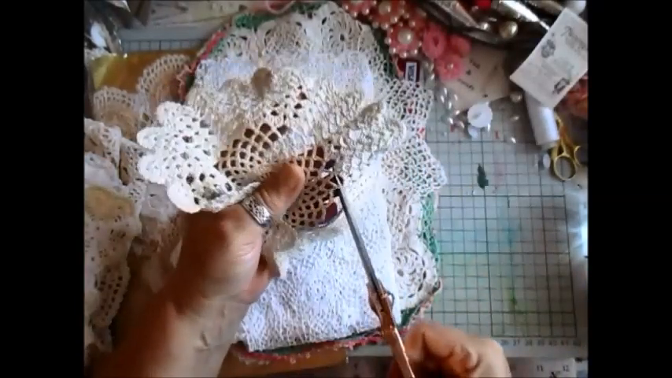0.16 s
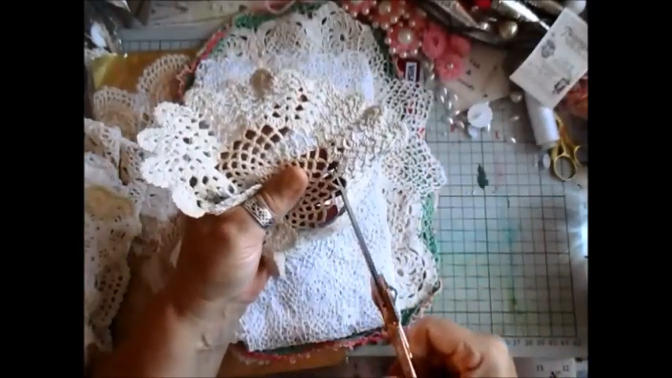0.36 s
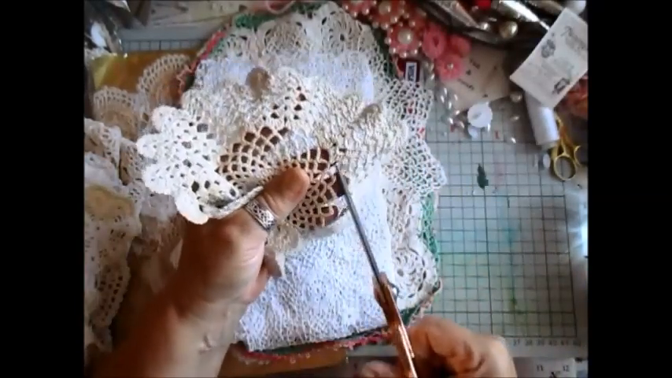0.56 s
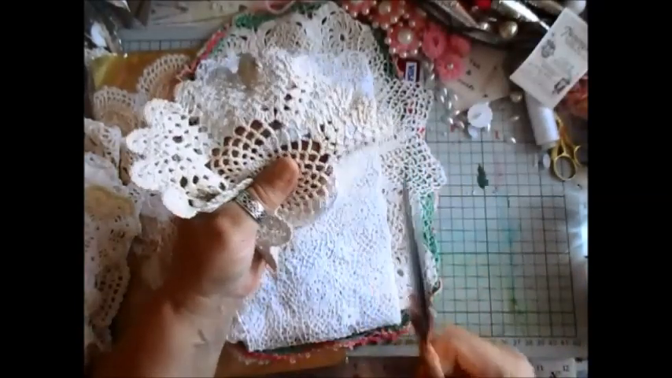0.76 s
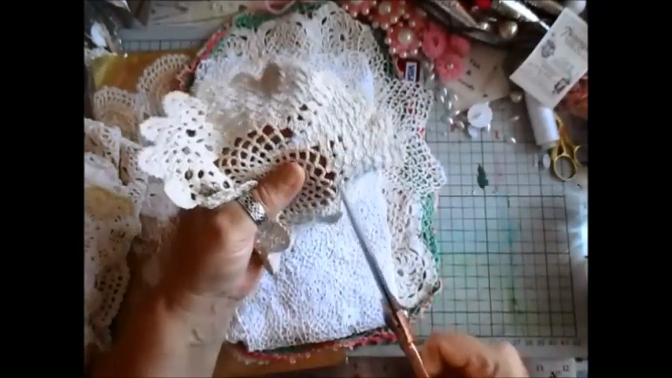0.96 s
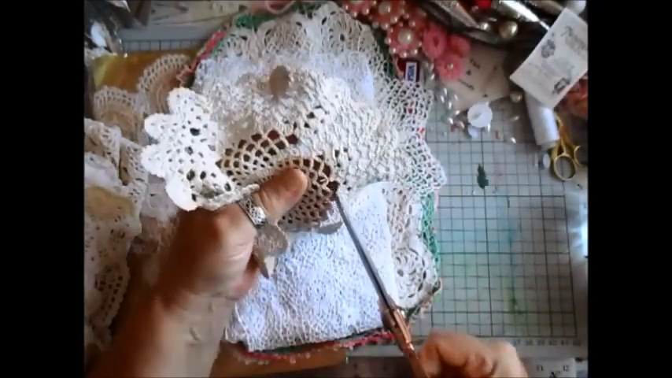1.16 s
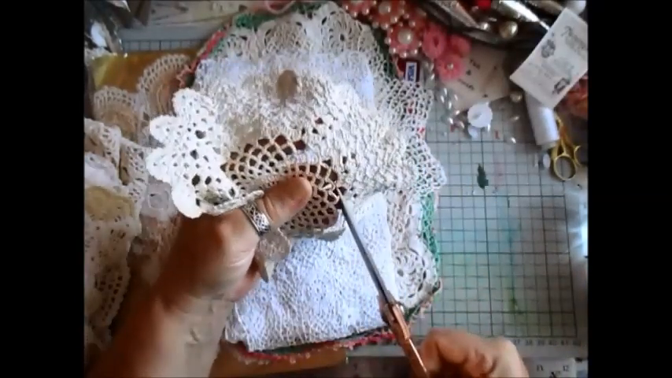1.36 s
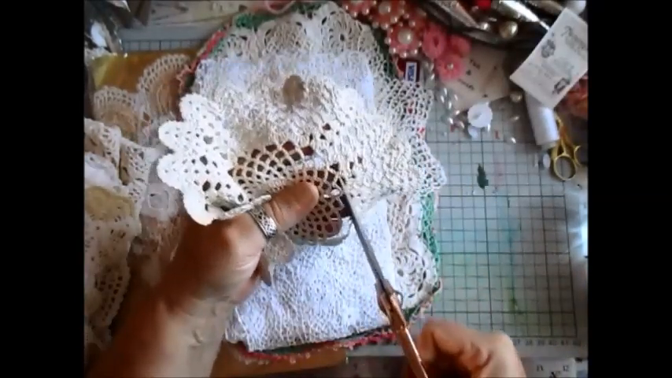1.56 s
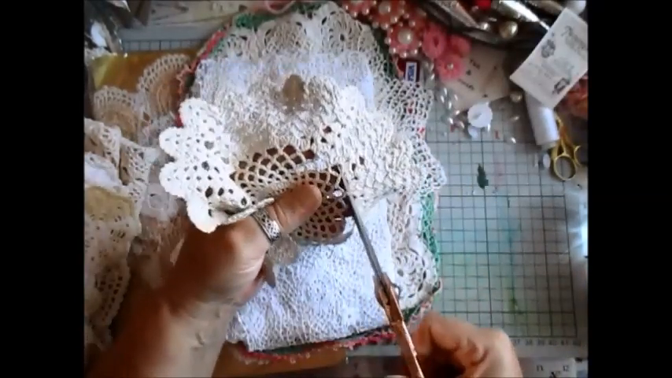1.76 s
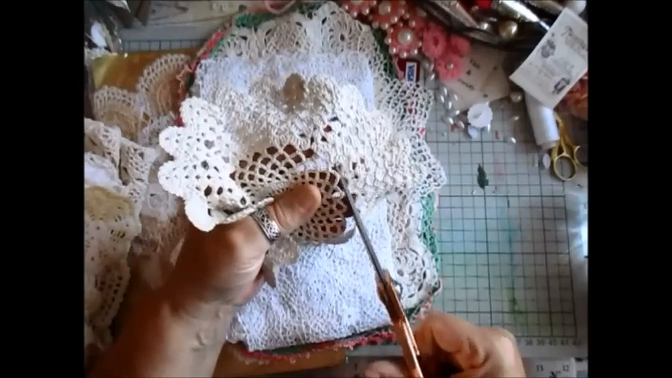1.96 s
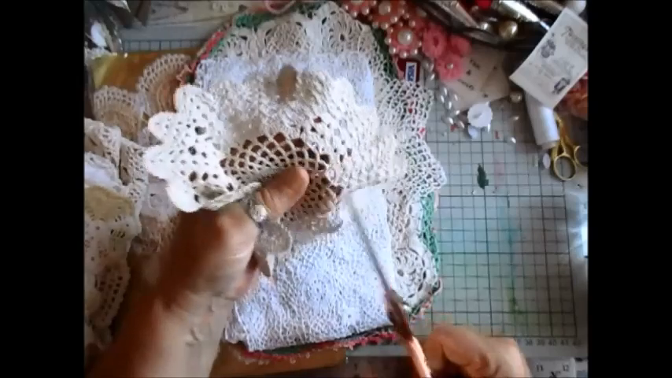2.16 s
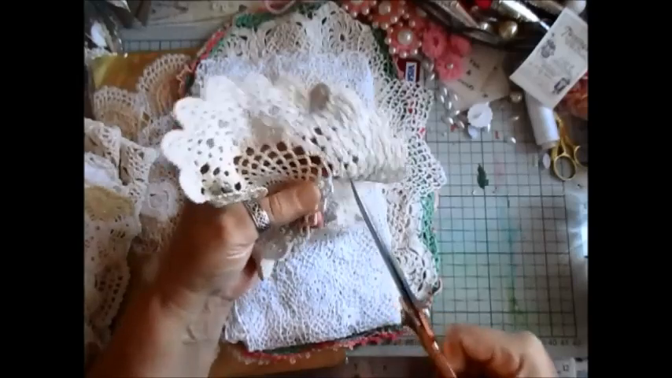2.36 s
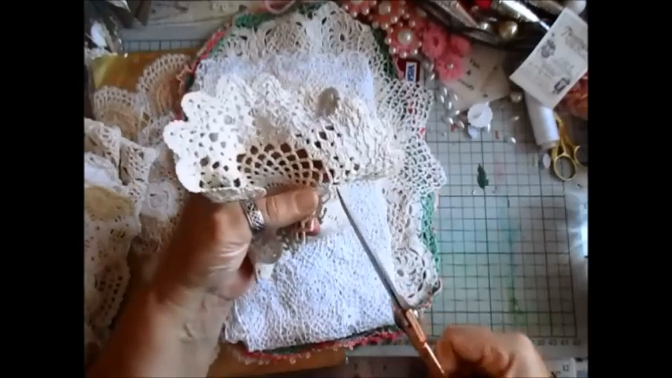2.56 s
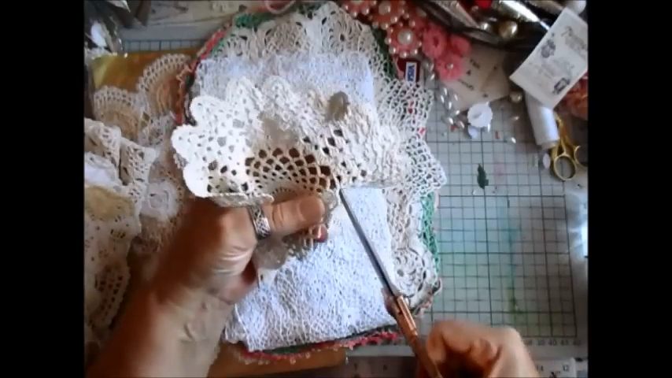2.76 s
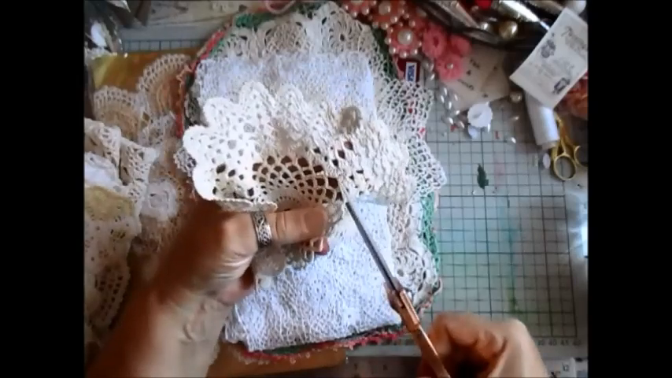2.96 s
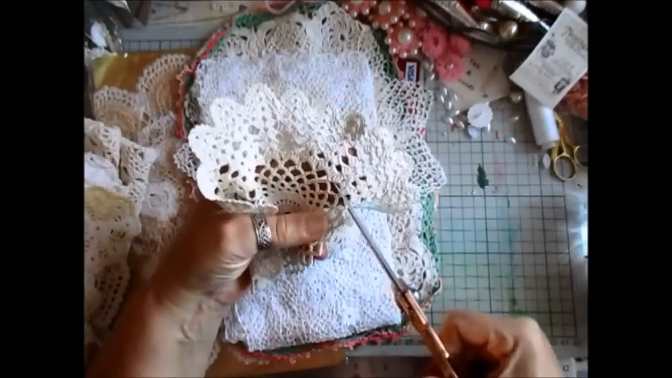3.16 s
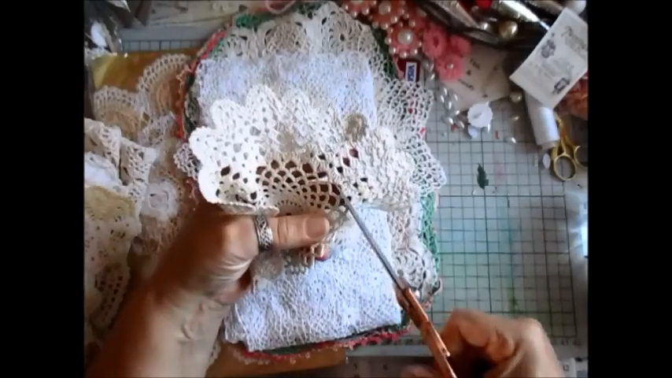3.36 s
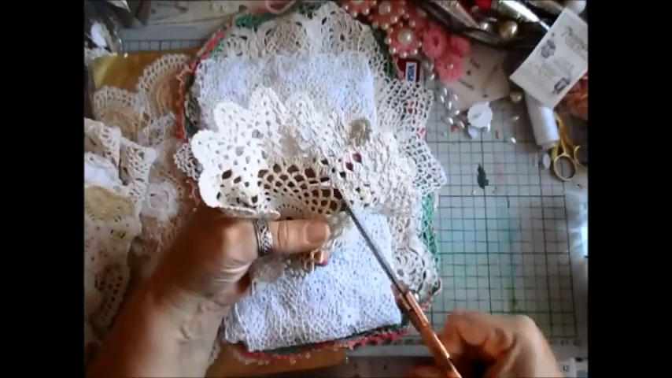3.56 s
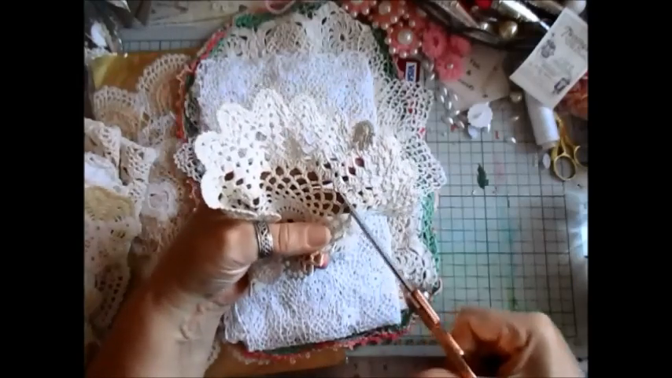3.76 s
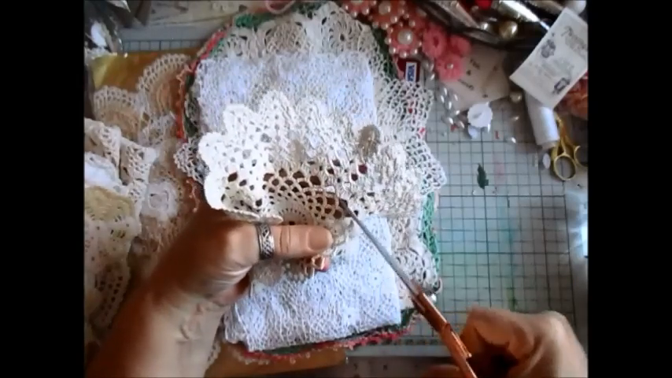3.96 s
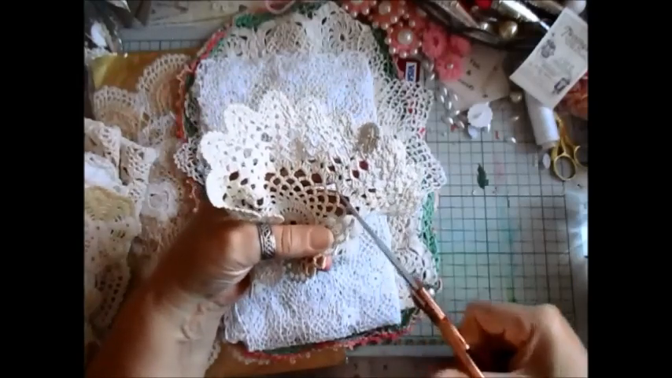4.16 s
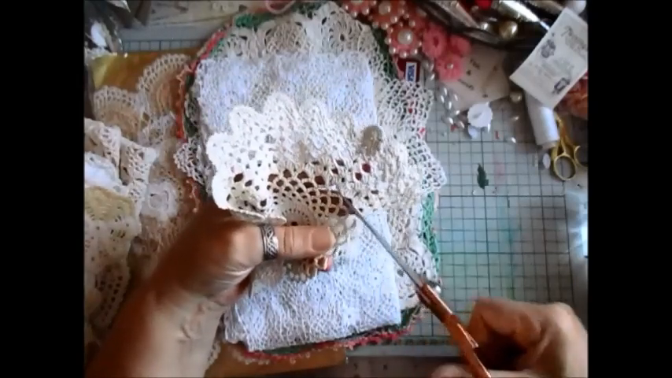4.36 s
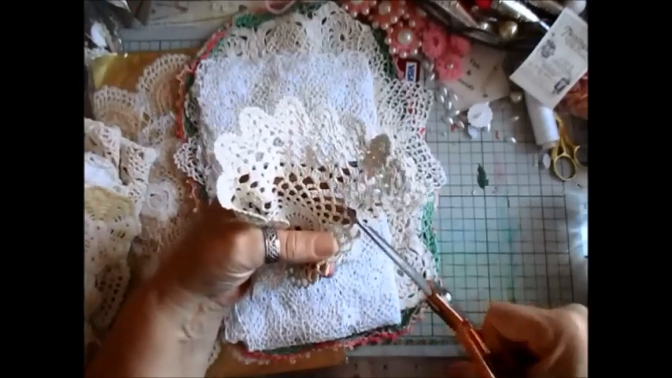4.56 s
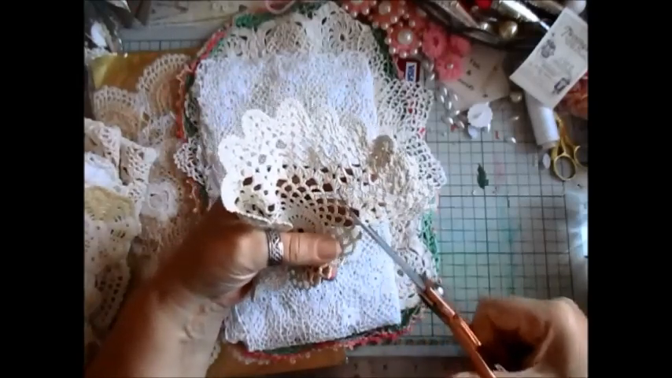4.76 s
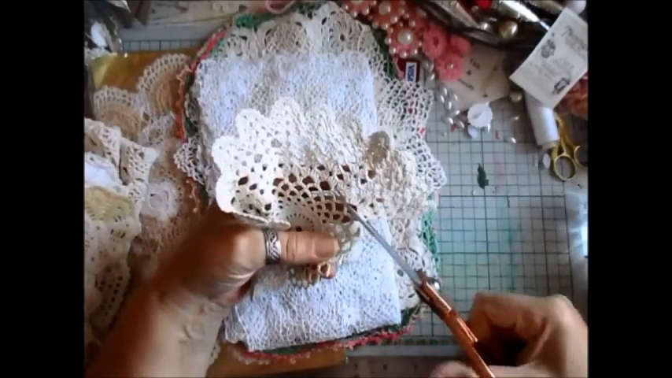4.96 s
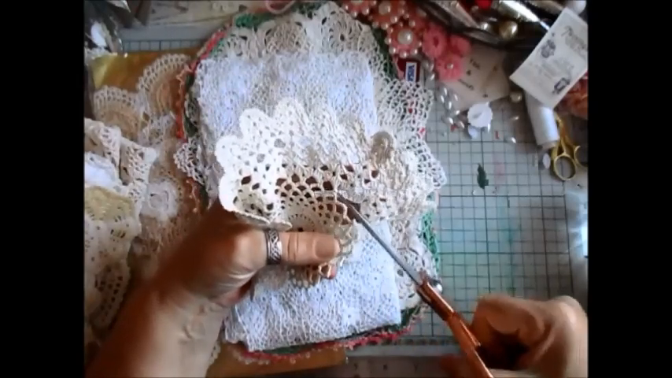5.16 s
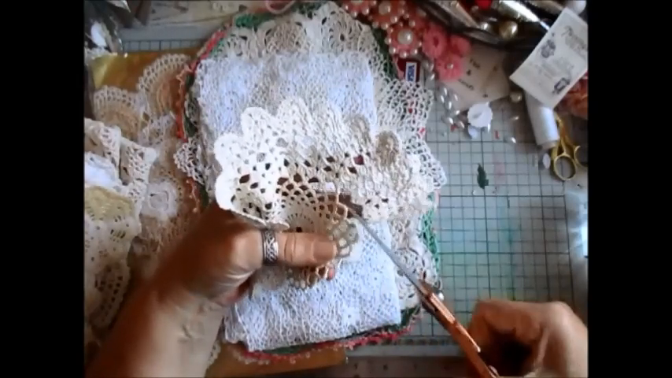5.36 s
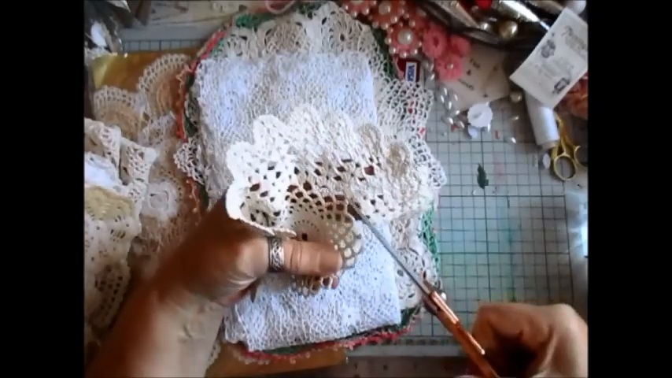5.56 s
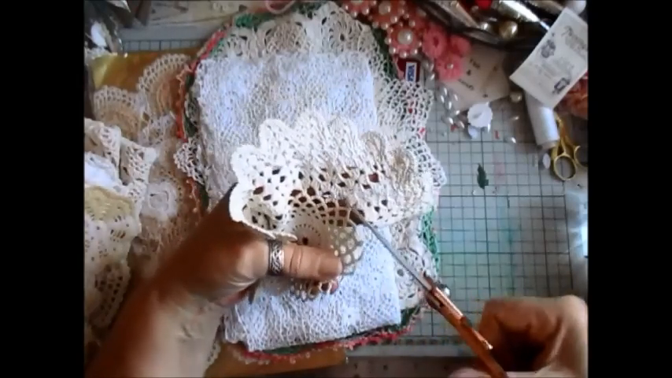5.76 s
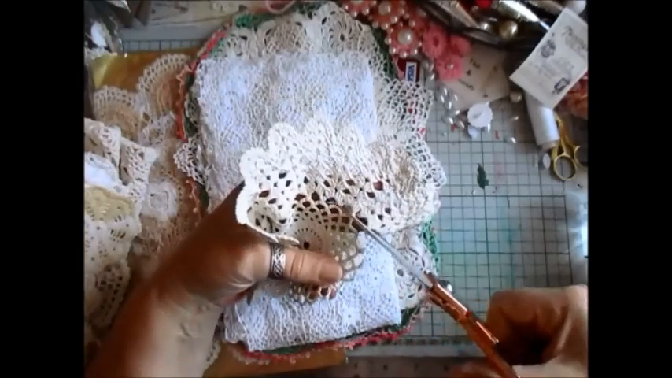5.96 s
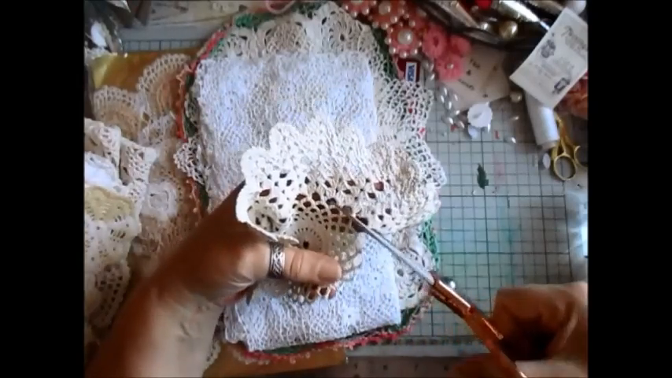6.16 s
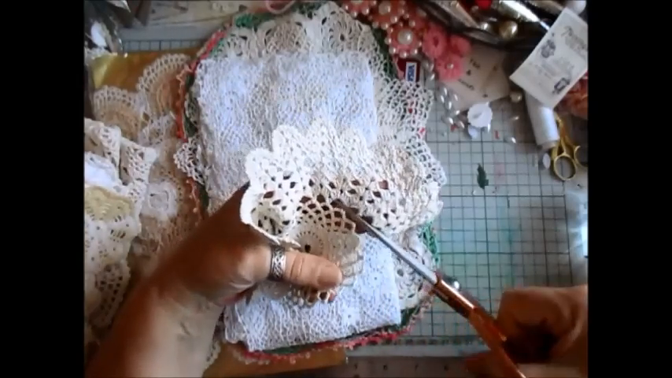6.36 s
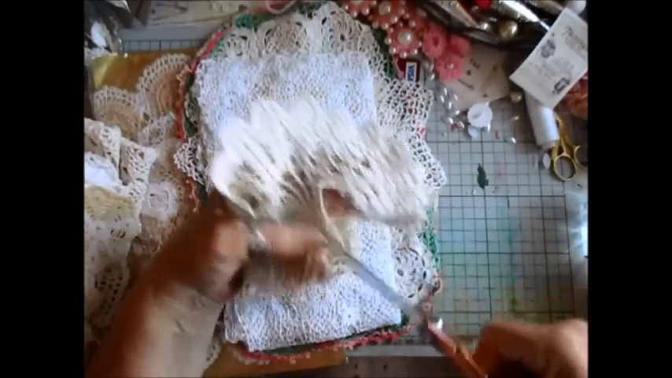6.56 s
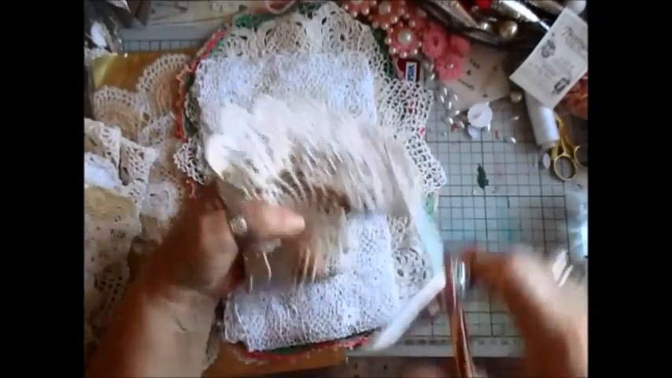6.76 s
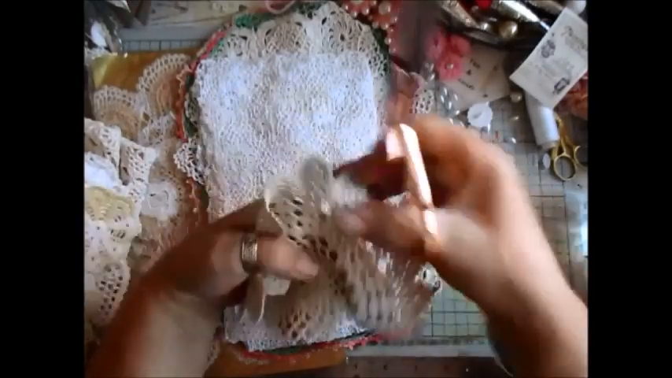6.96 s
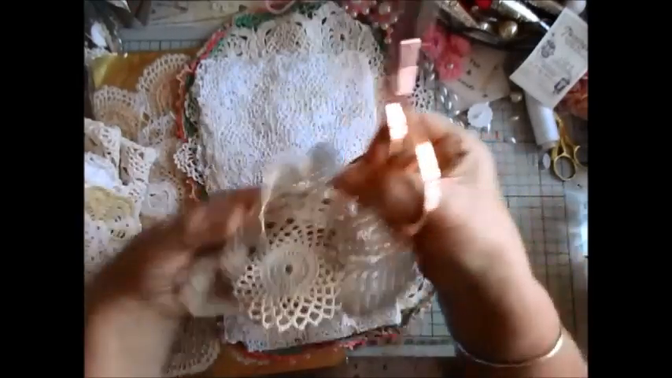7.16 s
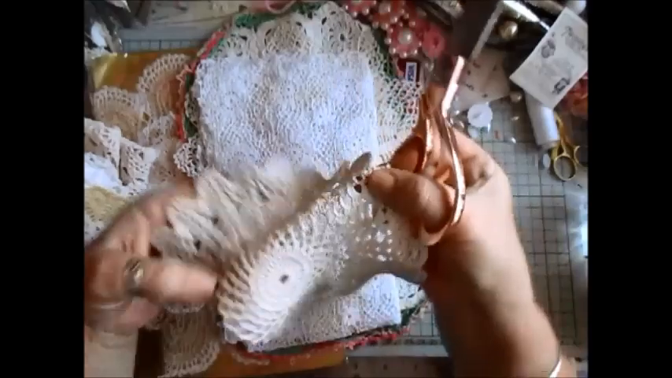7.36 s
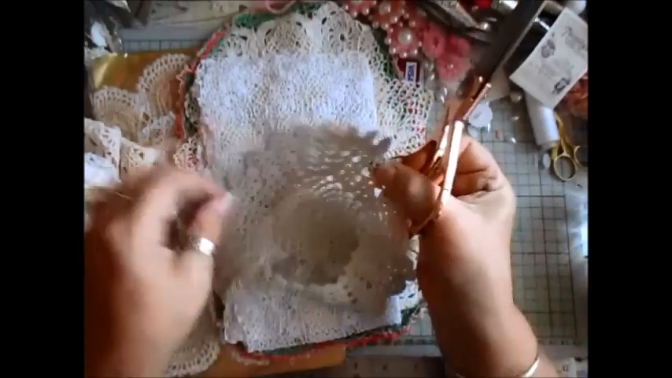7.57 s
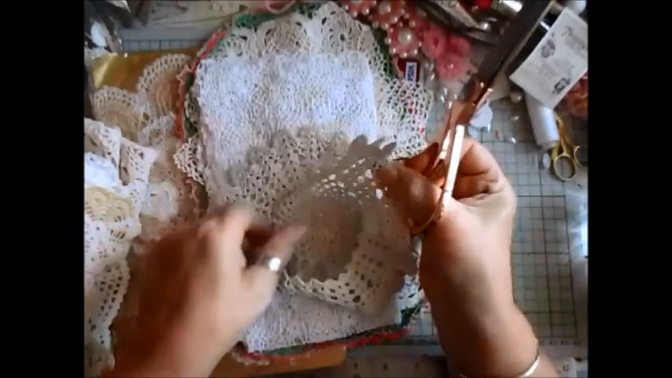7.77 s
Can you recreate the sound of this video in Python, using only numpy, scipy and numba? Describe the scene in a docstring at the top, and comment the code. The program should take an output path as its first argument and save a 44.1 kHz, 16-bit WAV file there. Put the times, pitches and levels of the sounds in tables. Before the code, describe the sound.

A near microphone at a craft table catches four isolated scissor cuts through crochet thread, loud and dry with a brief room tail. The background dips after each snap and creeps back. Long quiet gaps hold a dim clock tick, small squeaky blade rubs and a couple of soft knocks. The ending is gentle fibre rustling with little thread plucks and a final light tap.

```python
"""Room hiss and a mains hum come first; then steel scissors snip crochet threads above a work table.
Each cut: a sliding rise, a short noise crunch of thread, then a noise crack, ringing steel and a knock.
Between cuts: blade rubs (noise and a squeak), bumps (damped sines), lace rustle (grains and plucks).
A clock ticks faintly in filtered bursts. Near surfaces echo, a small quiet room adds a short tail.
The recorder's gain control ducks after each snap."""
import sys
import numpy as np
from scipy import signal
from scipy.fft import rfft, irfft
from scipy.io import wavfile
from scipy.ndimage import uniform_filter1d
from numba import njit

SR = 44100
rng = np.random.default_rng(int(sys.argv[2]) if len(sys.argv) > 2 else 0)


def unload_wav(signal):
    """Save mono or channel-first audio to the path in sys.argv[1] as 16-bit WAV at rate SR, clipped to [-1, 1]."""
    wavfile.write(
        sys.argv[1],
        SR,
        np.round(np.clip(np.atleast_2d(signal).T, -1, 1) * 32767).astype(np.int16),
    )


N = 345347

# Room hiss spectrum: (frequency [Hz], relative density [dB])
HISS_SPECTRUM = [(25, -14), (50, -11.5), (130, -8.5), (285, -13.5), (500, -16.5), (840, -17), (1300, -19),
                 (1800, -25), (4500, -29), (9570, -33.5), (16000, -42)]
# Clock tick spectrum: (frequency [Hz], relative density [dB])
TICK_SPECTRUM = [(600, -32), (1200, -9), (2500, -2), (4000, -0.5), (7000, -3.5), (11000, -16), (16000, -27)]
# Lace rustle spectrum: (frequency [Hz], relative density [dB])
LACE_SPECTRUM = [(590, -30), (1000, -4.5), (1150, -3), (2010, -12), (6780, -16), (13900, -25),
                 (16000, -27.5)]
# Steel crack spectrum: (frequency [Hz], relative density [dB])
STEEL_SPECTRUM = [(300, -40), (1500, -15), (3000, -10), (5500, -13), (8400, -2.5), (12000, -7), (14500, -2),
                  (16000, -1.5)]
# Rub and pluck spectrum: (frequency [Hz], relative density [dB])
RUBBING_SPECTRUM = [(600, -35.5), (1500, -7.5), (3000, -6.5), (5250, -4.5), (8000, -4), (12000, -5.5),
                    (16000, -12.5)]
# Thread crunch and blade slide spectrum: (frequency [Hz], relative density [dB])
FIBRE_SPECTRUM = [(300, -31.5), (1500, -4.5), (4000, -12), (8500, -5.5), (12000, -2.5), (16000, -2)]
# Lace turned over in the fingers: (time [s], level [dB])
RUSTLE_LEVELS = [(6.8, -77), (6.96, -68), (7.0, -69), (7.085, -62.5), (7.15, -71), (7.4, -76.5),
                 (7.6, -78.5), (7.63, -61.5), (7.7, -83)]
# Single threads plucking free: (time [s], peak level [dB])
THREAD_PLUCKS = [(6.745, -55), (6.935, -64), (6.961, -49.5), (7.018, -56), (7.053, -54), (7.062, -50.5),
                 (7.109, -66), (7.168, -57), (7.361, -60), (7.629, -59), (7.68, -60)]
# Hand or handle on the table: (time [s], thud [dB], tap frequency [Hz], tap [dB])
TABLE_BUMPS = [(3.4807, -36, 1547, -28), (3.6561, -41, 402, -31.5), (6.262, -36, 1300, -29),
               (7.590, -45, 2850, -24), (7.631, -42, 1100, -51)]
# Blades rubbing on each other or on thread:
# (time [s], peak level [dB], fall t60 [s], squeak frequency [Hz], squeak level [dB])
BLADE_RUBS = [(0.7882, -49.5, 0.072, 5390, -59), (0.832, -59, 0.067, 7620, -67),
              (1.969, -67, 0.035, 8300, -60), (2.2187, -48.5, 0.038, 4630, -56),
              (3.396, -64, 0.051, 9250, -65), (3.477, -51.5, 0.047, 9430, -50),
              (3.482, -44, 0.026, 7000, -55), (4.353, -60, 0.02, 6300, -56.5),
              (5.347, -47.5, 0.047, 9880, -63), (6.232, -50, 0.027, 7370, -52.5),
              (6.255, -48, 0.03, 9500, -51), (6.262, -40.5, 0.017, 7760, -54),
              (6.339, -51, 0.025, 12100, -66), (6.571, -46.5, 0.03, 5400, -53),
              (6.779, -50.5, 0.09, 6700, -52.5), (7.59, -47, 0.027, 5200, -52)]
# Cuts: (snap time [s], crack and blade-mode level [dB], place along the blades [0-1],
# closing slide [dB], crunch lead [s], crunch rise [s], crunch [dB], knock frequency [Hz], knock [dB])
SCISSOR_CUTS = [(0.5801, -13, 0.03, -52.5, 0.0025, .0014, -26.5, 480, -28),
                (2.0039, -12.5, 0, -44.5, 0.0014, .0007, -19, 411, -42),
                (5.1454, -14, .5, -54.5, 0.0022, .0003, -13, 800, -22),
                (6.3654, -12, 1, -55, 0.00073, 0.0015, -26, 1420, -18.5)]
# High blade modes: (frequency [Hz], mean level re crack level [dB], t60 before the cap [s])
HIGH_MODES = [(6444, -11, 0.019), (7000, -12.5, 0.036), (8600, -14.5, 0.0073), (10300, -18.5, 0.0077),
              (10730, -24, .01), (11140, -9.5, .01), (13430, -5, 0.0023), (14700, -14, .008),
              (14700, -12.5, .008)]
# Low bending modes of the blades:
# (frequency [Hz], level struck at place 0 [dB], at place 0.5 [dB], at place 1 [dB], t60 [s])
LOW_MODES = [(1760, -30.5, -27.5, -16, 0.0082), (2360, -18.5, -17.5, -35, .009),
             (3460, -29, -16, -28, .008), (3920, -14, -27.5, -37, 0.01), (4410, -11, -15, -24, .01),
             (4680, -11.5, -18, -14, .011)]
# Room decay: (frequency [Hz], t60 [s])
ROOM_DECAY = [(300, 0.18), (1500, 0.12), (2500, 0.17), (4500, 0.15), (7000, 0.12), (10000, 0.16),
              (13000, 0.12), (16000, 0.11)]
# Nearby surfaces: (delay [s], level [dB])
NEAR_ECHOES = [(.008, -11.5), (0.013, -20), (.018, -17.5)]

SWELL_S, SWELL_TOP_S = 0.17, 0.04
HISS_DB, HUM_HZ, HUM_DB = -61, 98.4, -64
CLOCK_START_S, CLOCK_CYCLE_S, TOCK_AFTER_S = 0.991, 1.999, 0.96   # uneven tick-tock
TICK_DB, TOCK_DB, TICK_RISE_S, TICK_T60_S = -57.5, -60.5, 0.004, 0.05
LEAD_S, LEAD_DB = 0.034, -62   # fainter click ahead of each tick
GRAINS_PER_S = 6000
PLUCK_RISE_S, PLUCK_T60_S = 0.0004, 0.016
THUD_HZ, THUD_RISE_S, THUD_T60_S = 191.5, 0.0004 / 3, 0.0012
TAP_RISE_S, TAP_T60_S = 0.00002, 0.0002
RUB_RISE_SHARE = 0.07   # rise time over fall t60
HIGH_MODE_T60_CAP_S, HIGH_MODE_SPREAD_DB = 0.016, 2.0
BODY_CUTOFF_HZ, KNOCK_T60_S = 700, 0.005
ROOM_DB, ROOM_BUILD_UP_S = -7.5, 0.0025
BUMP_ROOM_DB = -5.5   # bumps come through the table and stir the room less
DUCK_FROM_DB, DUCK_SHARE, ATTACK_S, RELEASE_S = -43.5, 0.46, 0.016, 0.48
ROLL_OFF_HZ, CUTOFF_HZ = 15300, 15950   # microphone roll-off; stopband edge


def from_db(db):
    """Decibels to amplitude ratio."""
    return 10 ** (np.asarray(db) / 20)


def rms_one(x):
    """Scales x to an RMS of 1."""
    return x / np.sqrt(np.mean(x ** 2) + 1e-20)


def energy_one(x):
    """Scales x to a sum of squares of 1."""
    return x / np.sqrt(np.sum(x ** 2))


def at_hz(points, hz):
    """Interpolates a table's second column over log frequency."""
    table_hz, values = np.array(points).T
    return np.interp(np.log(hz + 1), np.log(table_hz), values)


def coloured(x, spectrum):
    """Gives x a spectrum by a minimum-phase filter of unit energy."""
    log_gain = at_hz(spectrum, np.arange(2049) * SR / 4096) * np.log(10) / 20
    cepstrum = irfft(log_gain)
    cepstrum[1:2048] *= 2   # folding gives minimum phase
    cepstrum[2049:] = 0
    response = irfft(np.exp(rfft(cepstrum)))
    return signal.fftconvolve(x, energy_one(response))[:len(x)]


def drift(rate_hz):
    """Slow random wander of RMS 1: two-pole low-passed noise, drawn every 40 samples."""
    step = 40
    r = np.exp(-2 * np.pi * rate_hz * step / SR)
    noise = rng.standard_normal(N // step + 2002)
    slow = signal.lfilter([1], [1, -2 * r, r * r], noise)[2000:]   # drop the settling
    return np.interp(np.arange(N) / step, np.arange(len(slow)), rms_one(slow))


def ring(x, hz, t60_s):
    """Two-pole resonator: a unit click starts a decaying sine of initial height 1."""
    r = from_db(-60 / (t60_s * SR))
    w = 2 * np.pi * hz / SR
    return signal.lfilter([0, np.sin(w)], [1, -2 * r * np.cos(w), r * r], x + 1e-18)


def swell(rise_s, t60_s):
    """Envelope with exponential rise and fall; rise_s is a time constant."""
    t = np.arange(round(SWELL_S * SR)) / SR - SWELL_TOP_S
    rise = np.exp(np.minimum(t, 0) / rise_s)
    fall = from_db(-60 * np.maximum(t, 0) / t60_s)
    return rise * fall


def add(out, s, sound):
    """Lays a swell-shaped sound so that its top falls on s."""
    i = round((s - SWELL_TOP_S) * SR)
    out[i:i + len(sound)] += sound[:N - i]


def background():
    """Nearly steady filtered-noise hiss, and a sine hum that wavers in pitch and level."""
    hiss = rms_one(coloured(rng.standard_normal(N), HISS_SPECTRUM))
    hiss_gain = from_db(HISS_DB + 0.5 * drift(1.0))
    phase = 2 * np.pi * np.cumsum(HUM_HZ + 1.2 * drift(0.98)) / SR
    hum_gain = np.sqrt(2) * from_db(HUM_DB + 0.53 * drift(4.92))   # RMS to peak
    return hiss_gain * hiss + hum_gain * np.sin(phase)


def clock():
    """A far clock: short blurred noise bursts, tick and tock in turn."""
    out = np.zeros(N)
    burst = swell(TICK_RISE_S, TICK_T60_S)
    for k in range(4):
        for after_s, level_db in (-LEAD_S, LEAD_DB), (0, TICK_DB), (TOCK_AFTER_S, TOCK_DB):
            s = CLOCK_START_S + k * CLOCK_CYCLE_S + after_s
            noise = coloured(rng.standard_normal(len(burst)), TICK_SPECTRUM)
            if s * SR < N:
                add(out, s, from_db(level_db) * burst * noise)
    return out


def rustle():
    """Dense uneven fibre catches under the hand's motion, and single plucks."""
    s, level_db = np.transpose(RUSTLE_LEVELS)
    level = from_db(np.interp(np.arange(N) / SR, s, level_db, left=-140, right=-140))
    sizes = from_db(5.2 * np.minimum(rng.exponential(1, N), 5))
    signs = rng.choice([-1, 1], N)
    grains = sizes * signs * (rng.random(N) < GRAINS_PER_S / SR)
    out = level * from_db(2.0 * drift(40)) * rms_one(coloured(grains, LACE_SPECTRUM))
    pluck = swell(PLUCK_RISE_S, PLUCK_T60_S)
    for s, level_db in THREAD_PLUCKS:
        noise = coloured(rng.standard_normal(len(pluck)), RUBBING_SPECTRUM)
        add(out, s, from_db(level_db) * pluck * noise)
    return out


def bumps():
    """A soft low thud and a harder tap: short pushes ring sines that fall 60 dB in 2.5 cycles."""
    out = np.zeros(N)
    thud_push = swell(THUD_RISE_S, THUD_T60_S)
    tap_push = swell(TAP_RISE_S, TAP_T60_S)
    for s, thud_db, tap_hz, tap_db in TABLE_BUMPS:
        for level_db, hz, push in (thud_db, THUD_HZ, thud_push), (tap_db, tap_hz, tap_push):
            add(out, s, from_db(level_db) * ring(push / push.sum(), hz, 2.5 / hz))
    return out


def rubs():
    """Friction noise under a short stroke, with one blade mode singing in it."""
    out = np.zeros(N)
    for s, level_db, t60_s, squeak_hz, squeak_db in BLADE_RUBS:
        stroke = swell(RUB_RISE_SHARE * t60_s, t60_s)
        noise = rng.standard_normal((2, len(stroke)))
        friction = from_db(level_db) * coloured(noise[0], RUBBING_SPECTRUM)
        squeak = from_db(squeak_db) * rms_one(ring(noise[1], squeak_hz, 0.009))
        add(out, s, stroke * (friction + squeak))
    return out


def high_modes(noise):
    """The edges meet in a brief chatter that rings the high blade modes at uneven strengths."""
    chatter = energy_one(noise * swell(0.00005, 0.003))
    total = np.zeros(len(noise))
    for hz, level_db, t60_s in HIGH_MODES:
        gain = from_db(level_db + rng.normal(0, HIGH_MODE_SPREAD_DB))
        total += gain * ring(chatter, hz, min(t60_s, HIGH_MODE_T60_CAP_S))
    return total


def bending_modes(click, place):
    """Low blade modes, weighted by place struck; a high-pass keeps their ringing thin, with little below 700
    Hz."""
    total = np.zeros(len(click))
    for k, (hz, *levels_db, t60_s) in enumerate(LOW_MODES):
        gain = from_db(np.interp(place, [0, 0.5, 1], levels_db))
        total += (-1) ** k * gain * ring(click, hz, t60_s)   # neighbours swing in opposition
    high_pass = signal.butter(1, BODY_CUTOFF_HZ, "high", fs=SR, output="sos")
    return signal.sosfilt(high_pass, total)


def cuts():
    """The blades slide, fibres part in a bright crunch, and the snap is a crack that rings the steel."""
    out = np.zeros(N)
    click = np.zeros(round(SWELL_S * SR))
    click[round(SWELL_TOP_S * SR)] = 1
    for (s, crack_db, place, slide_db, lead_s, rise_s, crunch_db,
         knock_hz, knock_db) in SCISSOR_CUTS:
        noise = rng.standard_normal((4, len(click)))
        crack = coloured(noise[0] * swell(0.0001, 0.018), STEEL_SPECTRUM)
        snap = from_db(crack_db) * (crack + high_modes(noise[1]))
        knock = from_db(knock_db) * ring(click, knock_hz, KNOCK_T60_S)
        slide = from_db(slide_db) * coloured(noise[2] * swell(0.014, 0.003), FIBRE_SPECTRUM)
        crunch = from_db(crunch_db) * coloured(noise[3] * swell(rise_s, 0.018), FIBRE_SPECTRUM)
        add(out, s, snap + bending_modes(click, place) + knock + slide)
        add(out, s - lead_s, crunch)
    return out


def room(x):
    """A few near echoes, and a noise tail that dies band by band."""
    t = np.arange(SR // 3) / SR
    tail = np.zeros(len(t))
    edges_hz = np.geomspace(150, 17000, num=19)
    for low, high in zip(edges_hz, edges_hz[1:]):
        band_pass = signal.butter(2, [low, high], "band", fs=SR, output="sos")
        band = signal.sosfilt(band_pass, rng.standard_normal(len(t)))
        tail += band * from_db(-60 * t / at_hz(ROOM_DECAY, np.sqrt(low * high)))
    tail *= np.clip(t / ROOM_BUILD_UP_S, 0, 1)   # builds up over the first reflections
    response = from_db(ROOM_DB) * energy_one(tail)
    for s, level_db in NEAR_ECHOES:
        response[round(s * SR)] += from_db(level_db)
    return signal.fftconvolve(x, response)[:N]


def scene():
    """Sums direct sound, room response and background."""
    near = cuts() + rubs() + rustle() + clock()
    knocks = bumps()
    reverb = room(near + from_db(BUMP_ROOM_DB) * knocks)
    return (near + knocks + reverb + background())[None]


@njit
def follow(wanted_db, attack, release):
    """One-pole gain follower: goes down fast, comes back slowly."""
    out, now = np.zeros(len(wanted_db)), 0.
    for i in range(len(wanted_db)):
        now += (wanted_db[i] - now) * (attack if wanted_db[i] < now else release)
        out[i] = now
    return out


def record(dry):
    """Gain control on the trailing 5 ms level, then the top rolls off and is cut."""
    power = uniform_filter1d(dry[0] ** 2, size=221, origin=110)
    level_db = 10 * np.log10(power.clip(1e-12))
    wanted_db = -DUCK_SHARE * (level_db - DUCK_FROM_DB).clip(0)
    duck_db = follow(wanted_db, 1 / (ATTACK_S * SR), 1 / (RELEASE_S * SR))
    roll_off = signal.butter(N=10, Wn=ROLL_OFF_HZ, fs=SR, output="sos")
    soft = signal.sosfilt(roll_off, dry * from_db(duck_db))
    return signal.sosfilt(signal.cheby2(24, 60, CUTOFF_HZ, fs=SR, output="sos"), soft)


dry = scene()
out = record(dry)
unload_wav(out)
```